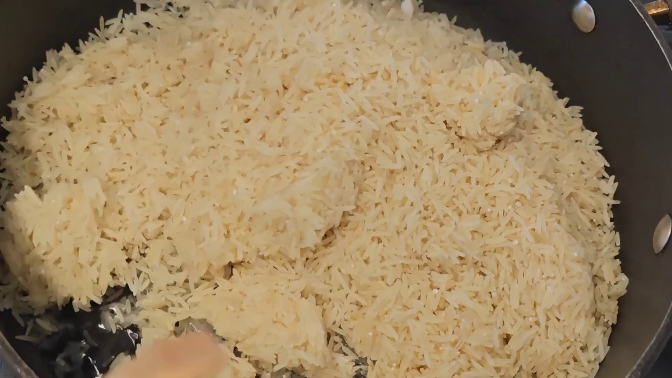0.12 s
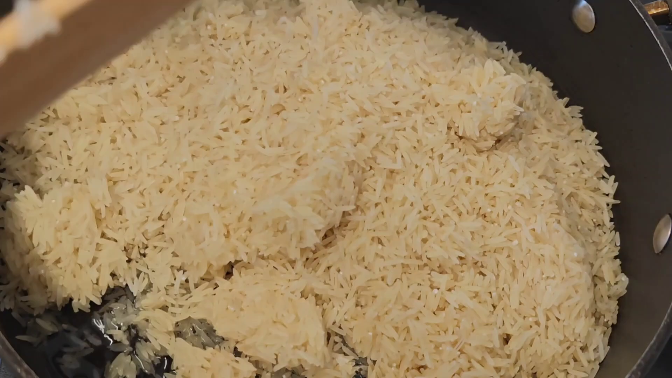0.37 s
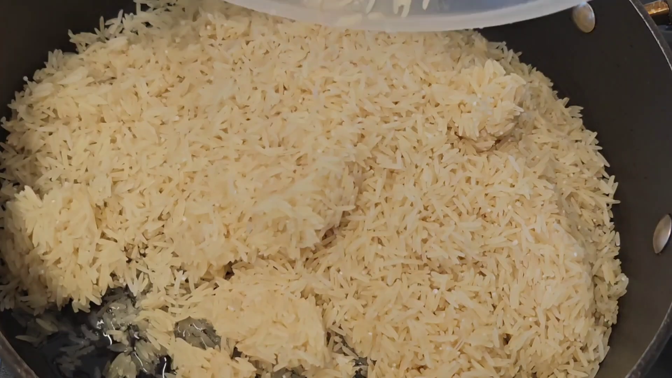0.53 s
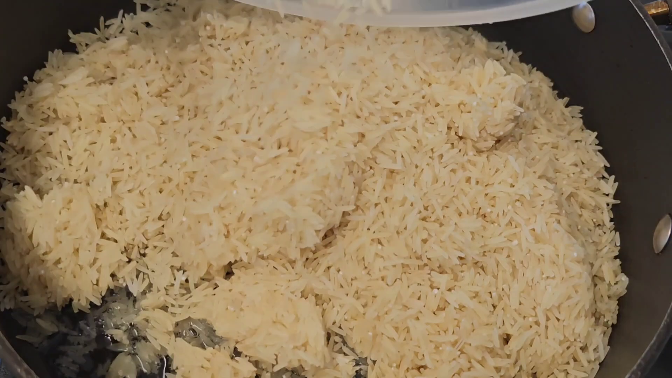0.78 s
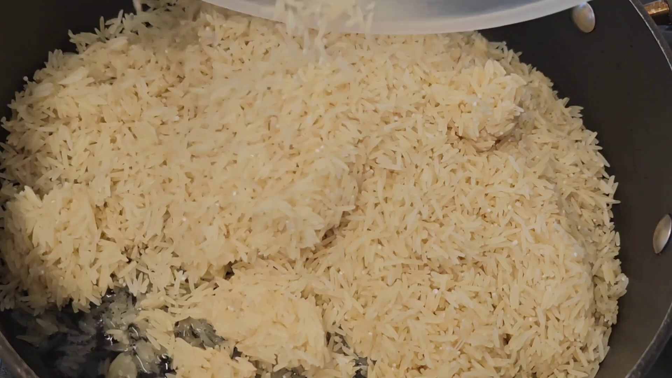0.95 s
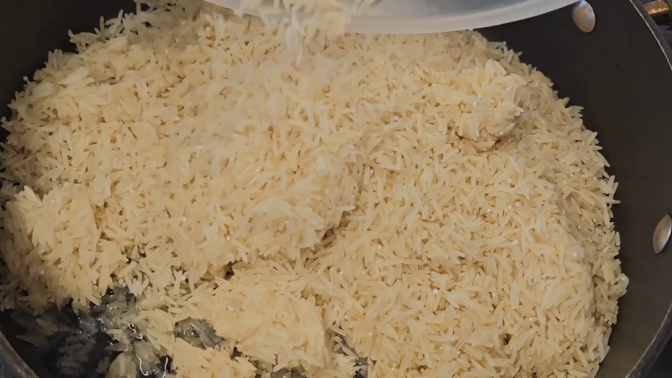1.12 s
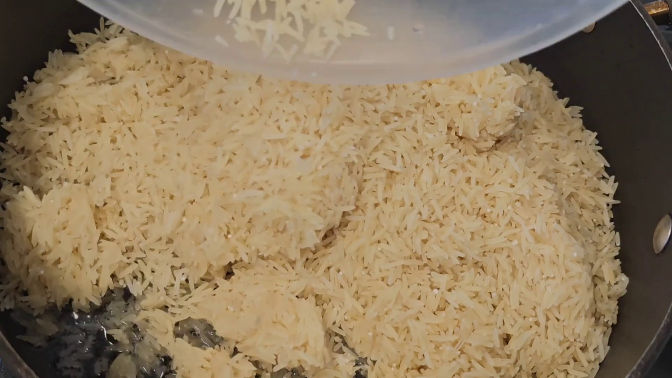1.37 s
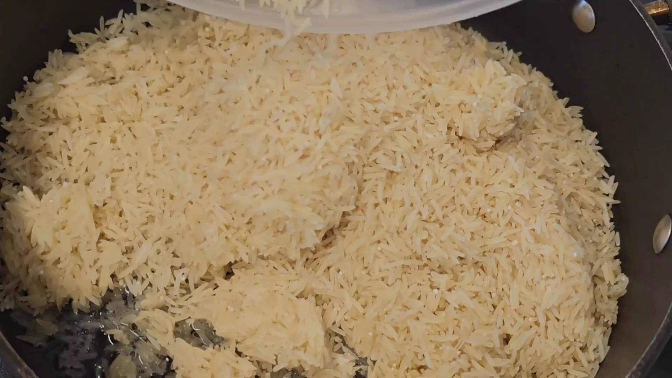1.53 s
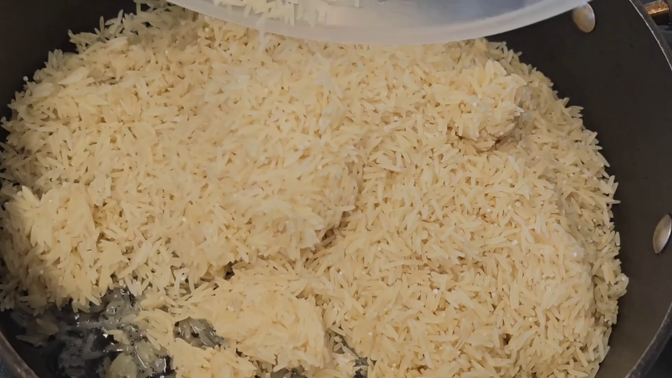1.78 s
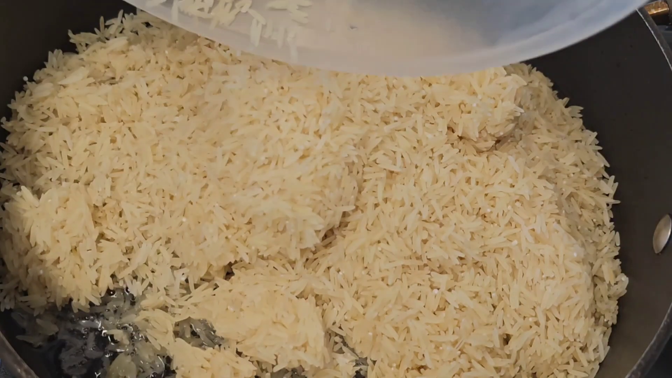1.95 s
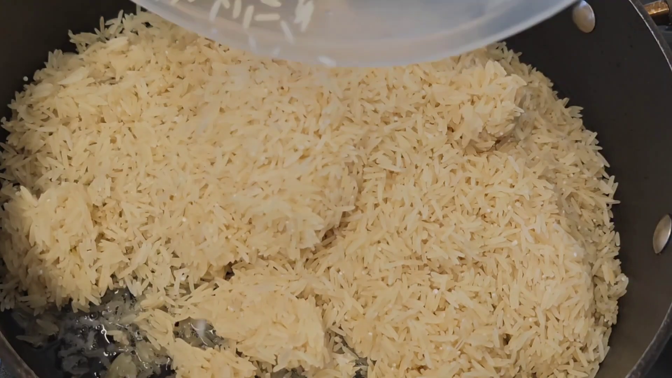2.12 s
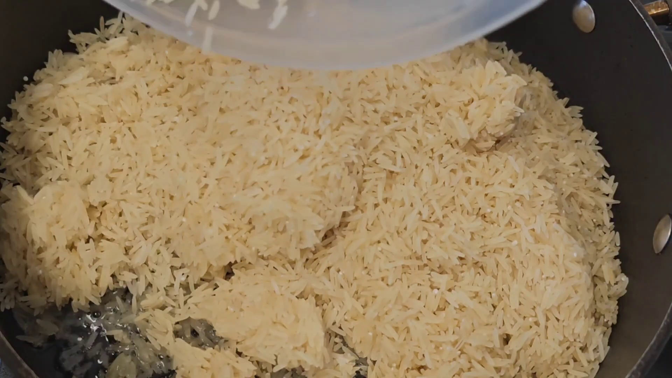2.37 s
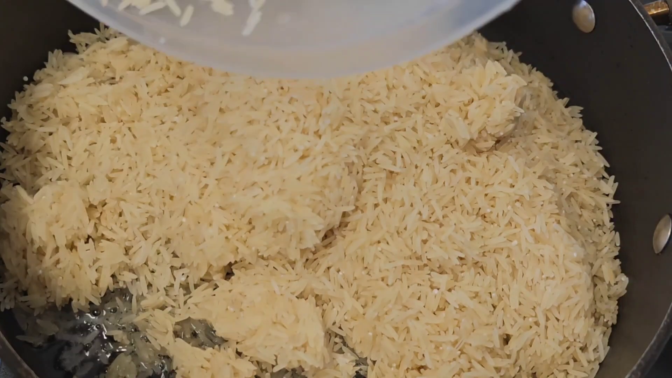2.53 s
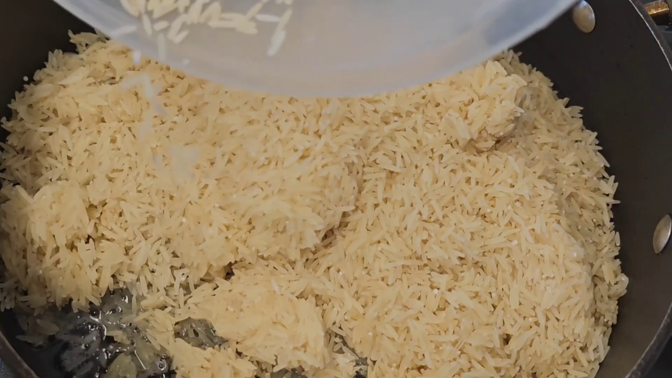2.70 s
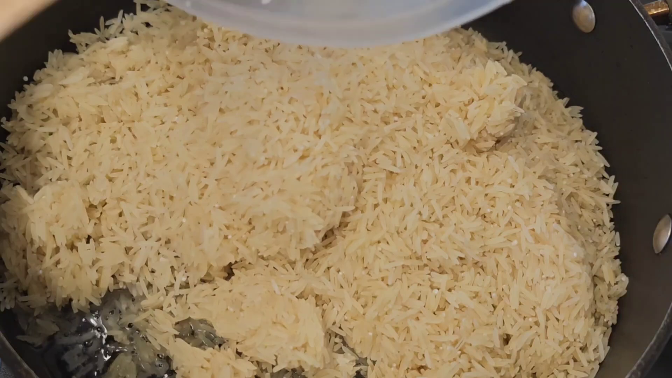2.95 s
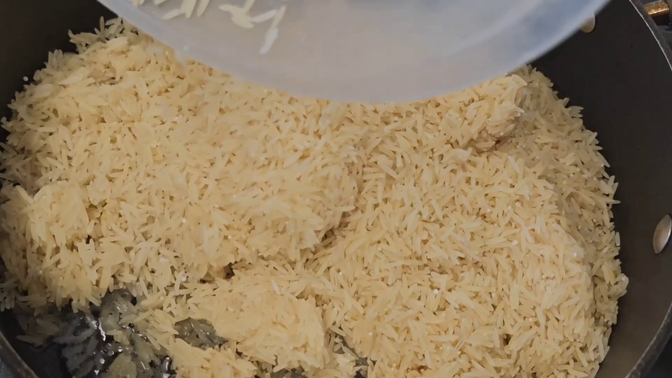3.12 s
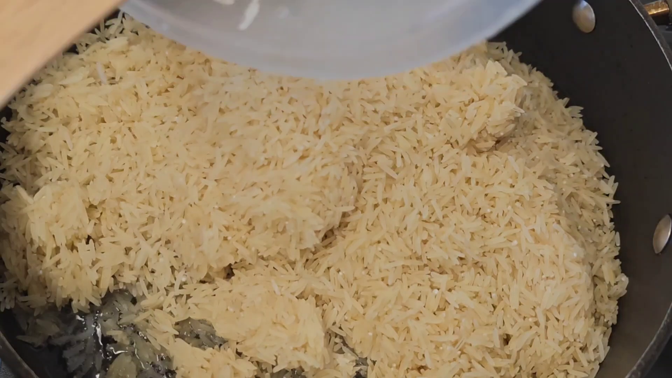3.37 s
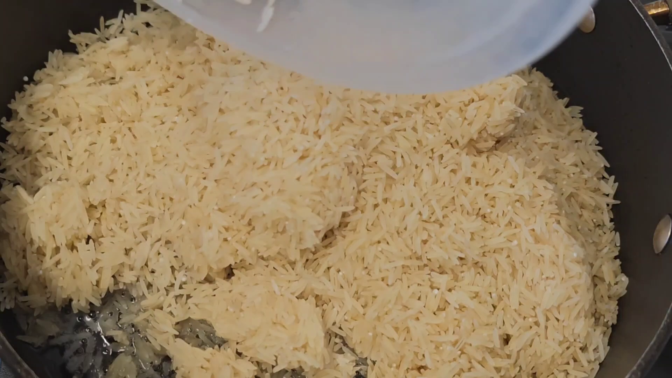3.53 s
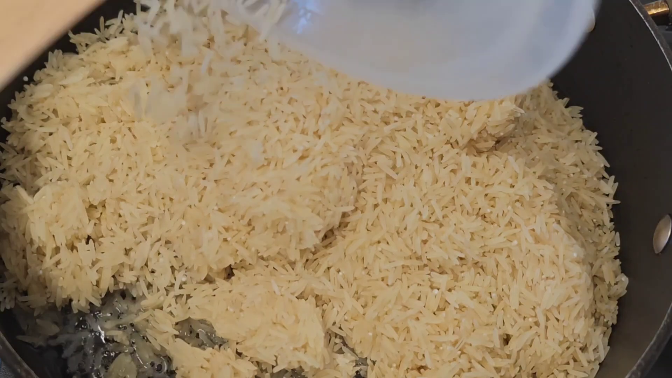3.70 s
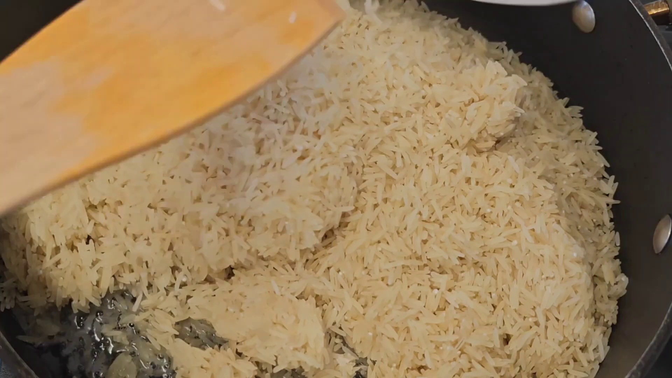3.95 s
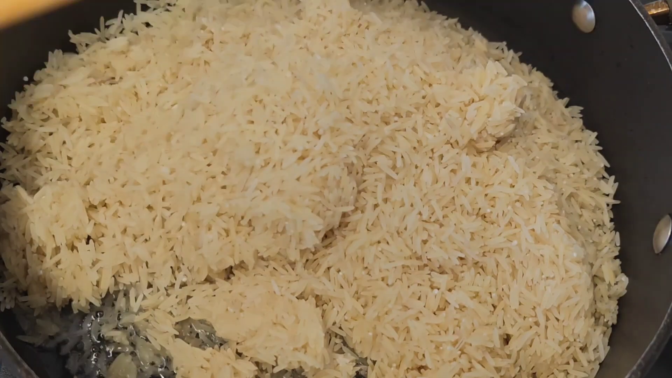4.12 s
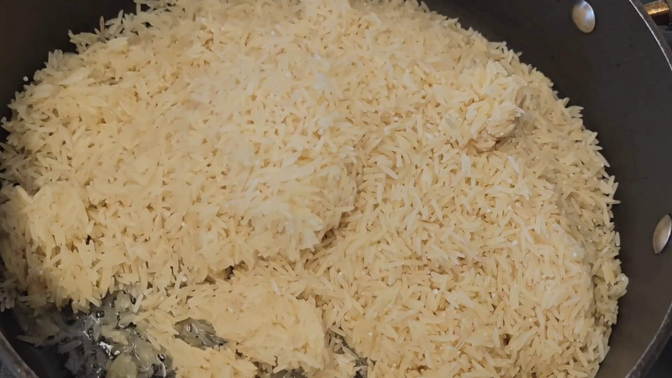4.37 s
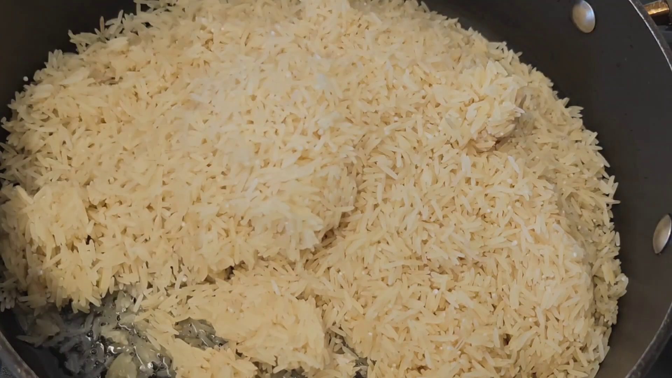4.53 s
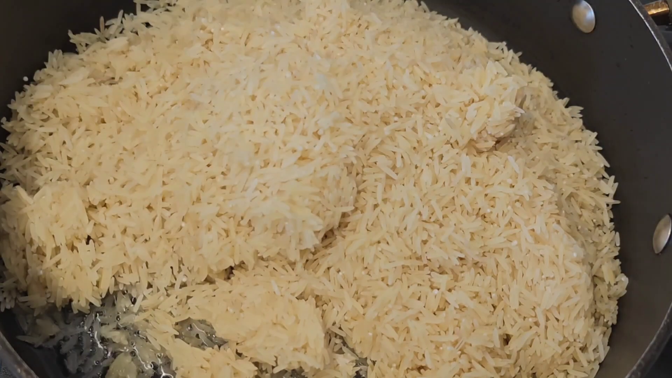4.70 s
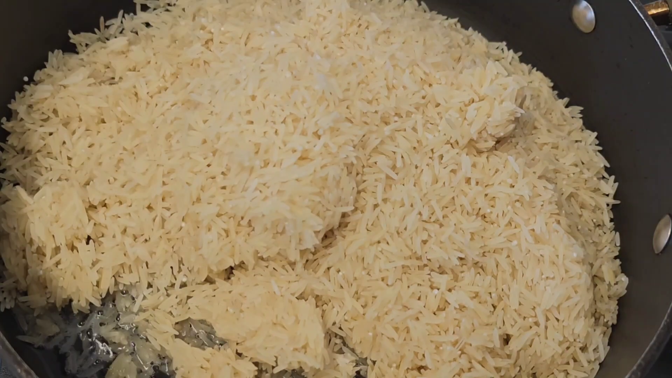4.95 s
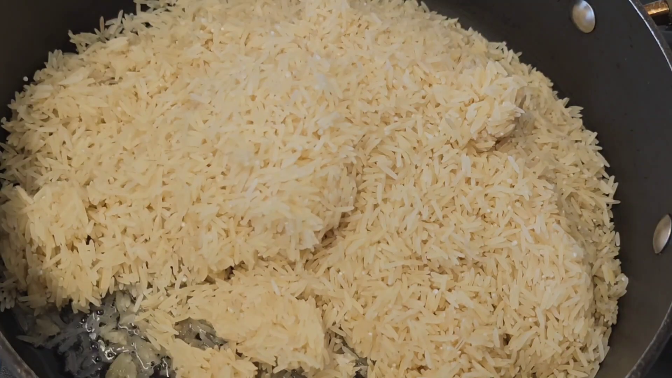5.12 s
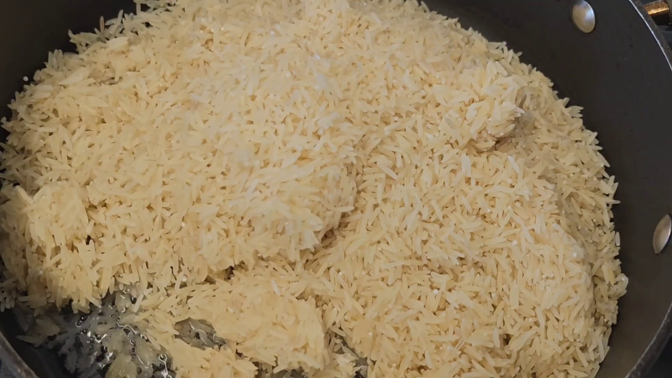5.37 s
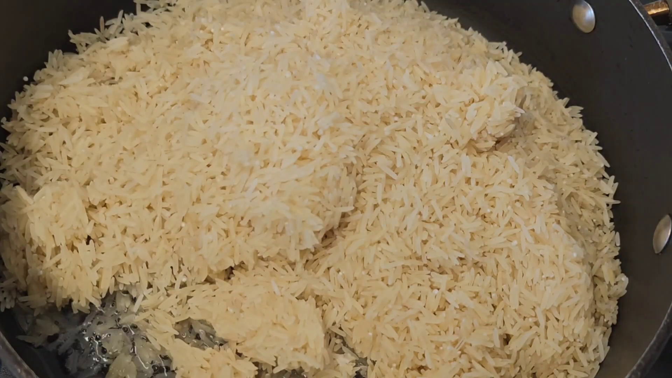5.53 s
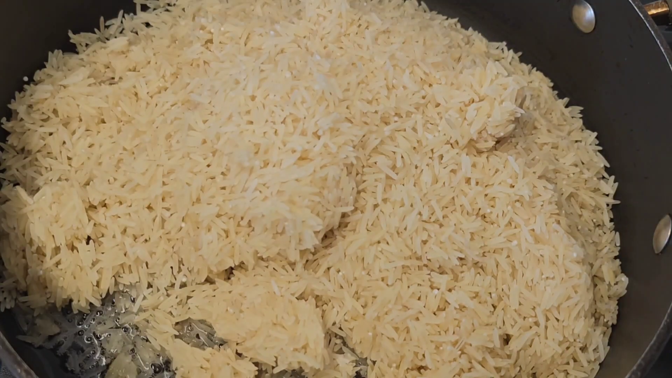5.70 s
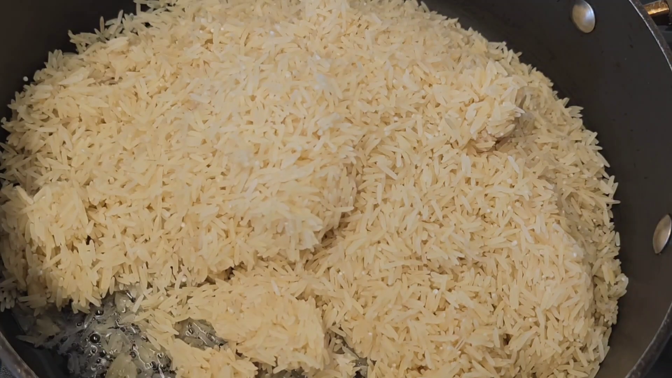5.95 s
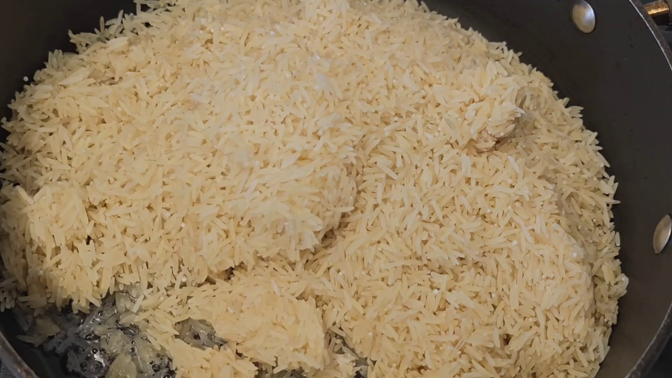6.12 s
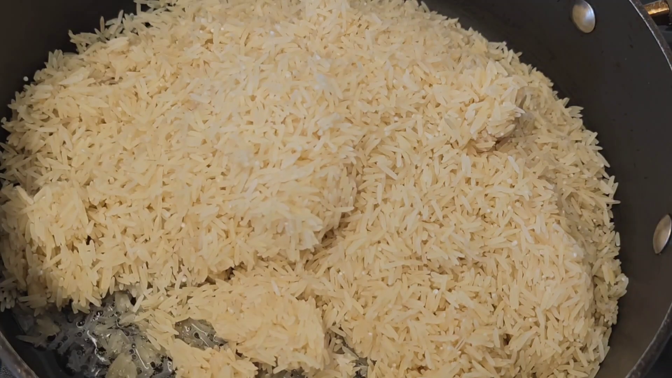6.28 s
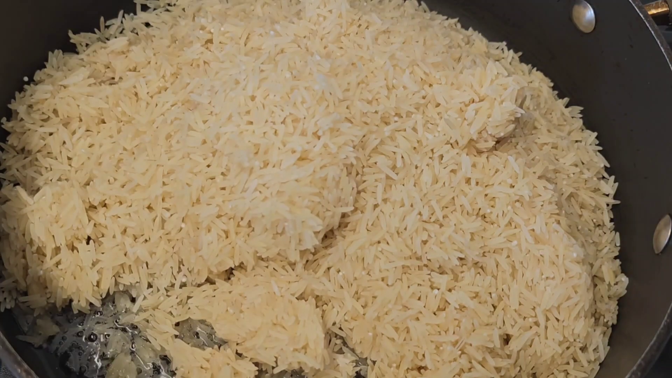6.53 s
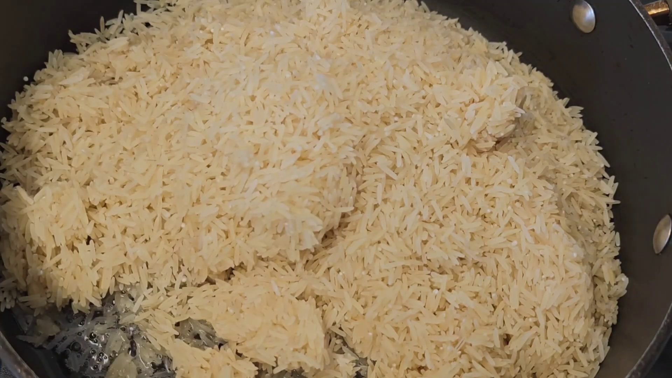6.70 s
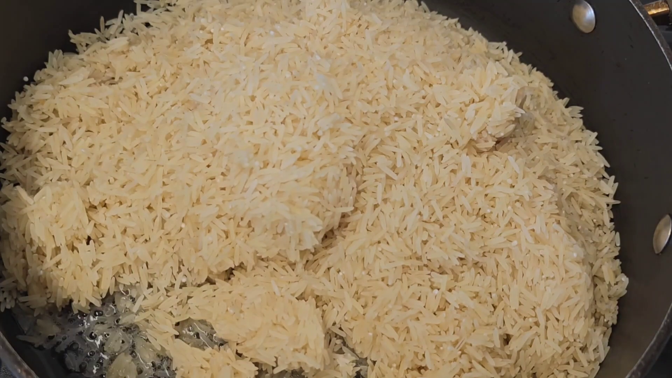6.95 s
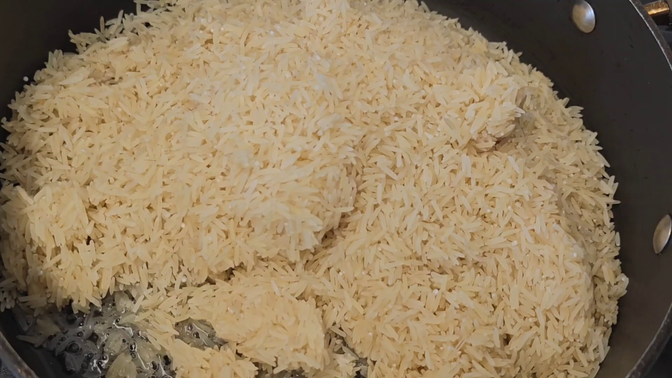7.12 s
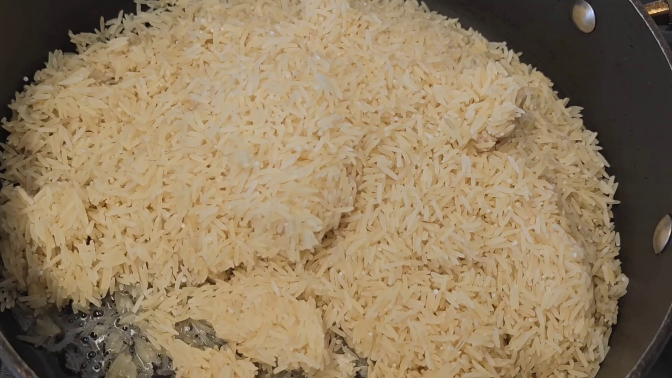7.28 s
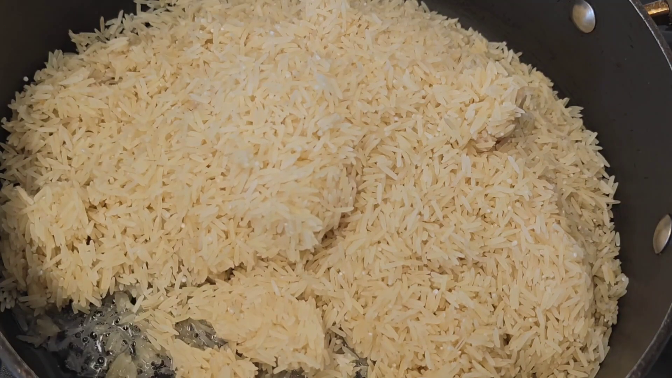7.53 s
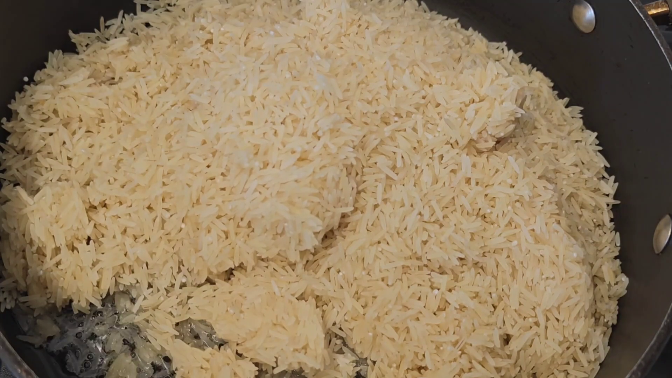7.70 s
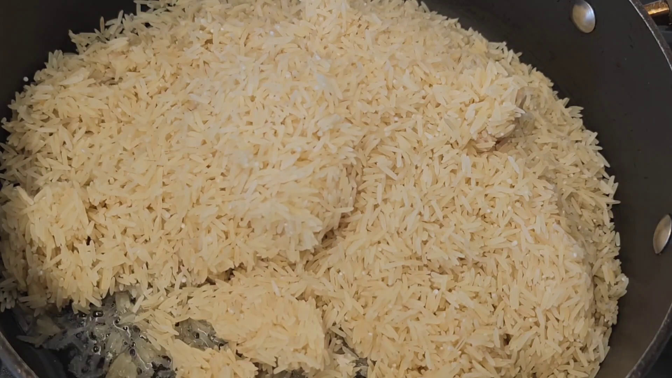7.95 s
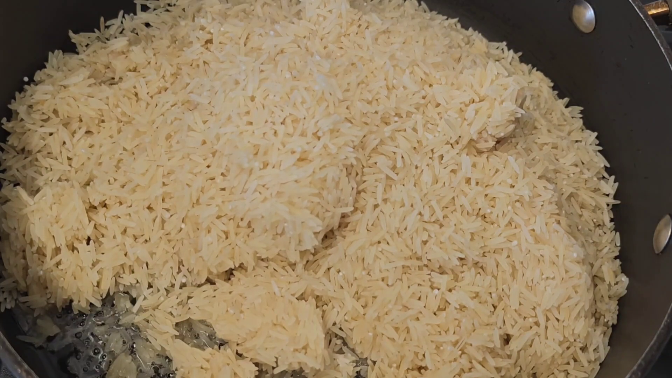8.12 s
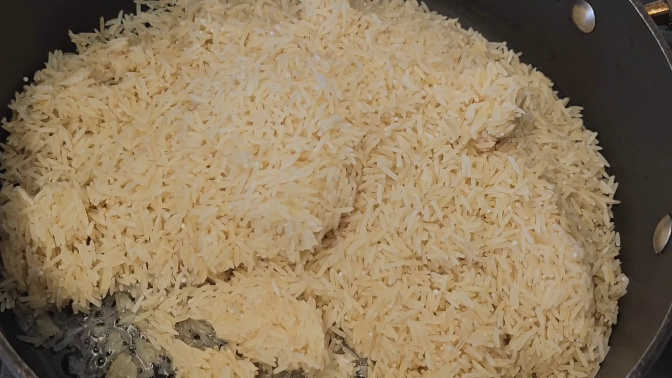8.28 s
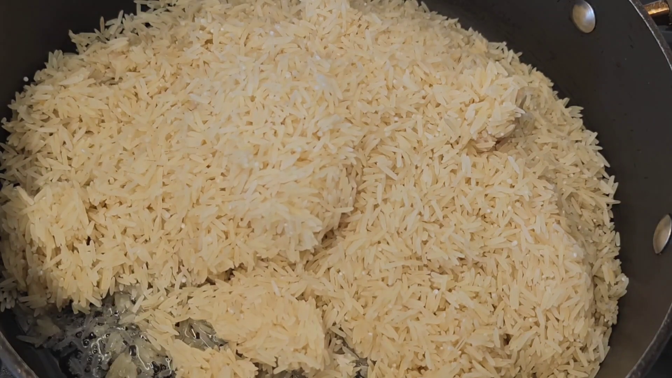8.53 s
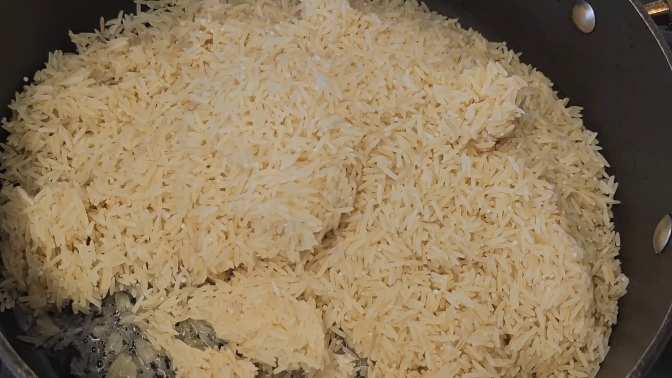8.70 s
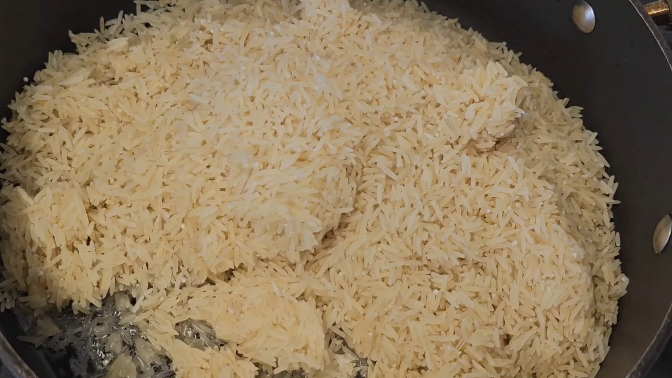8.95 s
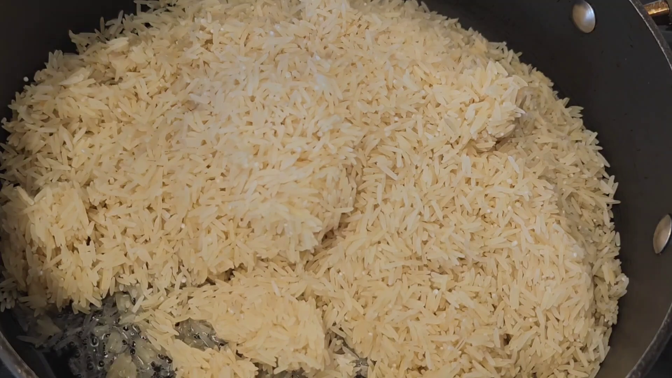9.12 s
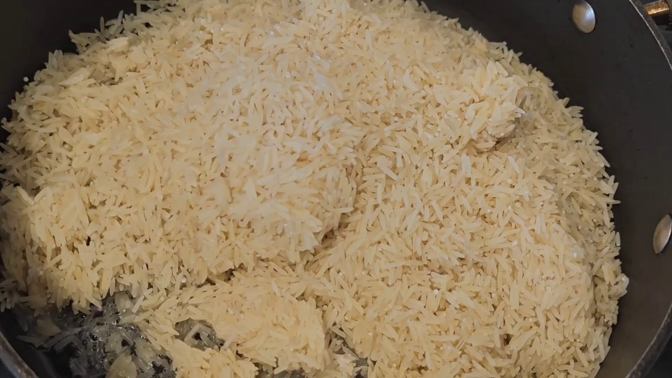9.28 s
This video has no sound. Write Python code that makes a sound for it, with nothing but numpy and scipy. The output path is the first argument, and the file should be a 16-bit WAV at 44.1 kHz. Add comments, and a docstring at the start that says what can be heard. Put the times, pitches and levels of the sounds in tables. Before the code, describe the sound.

Oil fizzes close by in a pot throughout, a fine high hiss with scattered sharp spits and pops. A brief slide of rice grains opens the sound. From about 0.8 to 1.4 seconds a plastic bowl takes five quick hollow knocks as wet raw rice rushes out and patters into the pot. From 2 to 4 seconds a wooden spatula knocks and rubs the bowl in short, uneven strokes, with small spills of grains; the loudest knocks come near 2.6 and 3.5 seconds. Just after 4 seconds the sizzle drops a little and the handling becomes much quieter. Soft scrapes and light trickles of rice continue on and off, with a faint tap near 6 seconds and a few more between 8 and 9.3 seconds. The oil keeps spitting until the end at about 9.5 seconds. A faint low hum of kitchen appliances lies underneath.

```python
"""Rice into a frying pot.

Wet raw rice is shaken and scraped from a plastic bowl into a pot of frying rice, close by.
Grains slide and patter; a wooden spatula knocks and rubs the bowl, driving its modes.
The oil fizzes with small bubbles and spits as water bursts in it. Kitchen machines hum faintly."""
import sys
import numpy as np
from scipy import signal
from scipy.fft import rfft, irfft, next_fast_len
from scipy.io import wavfile

SR = 44100
rng = np.random.default_rng(int(sys.argv[2]) if len(sys.argv) > 2 else 0)


def digitize_waveform(pressure):
    """Quantize a signal to 16-bit integers and store it at the path in sys.argv[1].

    Rows of a 2-D input are taken as channels; values are limited to [-1, 1].
    """
    field = np.atleast_2d(pressure).T
    bounded = np.clip(field, -1, 1)
    quanta = np.round(bounded * 32767).astype(np.int16)
    wavfile.write(sys.argv[1], SR, quanta)


N = 417186

# spatula strokes (time [s], length [s], rice level [dB], rub level [dB], best excited pitch [Hz])
STROKES = [(0, 0.17, -34.5, -78, 500), (0.817, 0.2, -31, -31, 388), (0.986, 0.18, -31, -30.5, 394),
           (1.175, 0.2, -30, -32.5, 420), (1.321, .11, -33, -43, 477), (1.52, 0.14, -63, -39.5, 524),
           (1.612, 0.22, -40, -78, 490), (1.992, 0.19, -58, -39.5, 380), (2.1, 0.13, -33.5, -80, 400),
           (2.412, 0.15, -61, -36.5, 357), (2.595, 0.11, -46, -27.5, 625), (3.052, 0.1, -32, -37, 290),
           (3.485, 0.17, -60, -27, 537), (3.81, 0.12, -34, -32.5, 544), (3.934, 0.23, -40.5, -49, 443),
           (4.567, 0.14, -47.5, -85, 497), (5.18, 0.28, -45, -51.5, 920), (5.453, 0.28, -45.5, -43, 450),
           (6.158, 0.16, -44, -47.5, 1460), (6.447, 0.257, -41.5, -56, 460), (6.605, 0.1, -65, -38.5, 337),
           (6.904, 0.18, -46, -48, 367), (7.55, 0.49, -50.5, -52.5, 567), (8.075, 0.25, -54.5, -45, 980),
           (8.423, 0.13, -44.5, -43.5, 450), (8.556, 0.18, -45.5, -47.5, 1070),
           (8.872, 0.41, -47.5, -46, 374)]
# stray grains between the rushes (time [s], level [dB])
TRICKLE = [(0, -41.5), (4.1, -44.5), (4.3, -55.5)]
# spectrum of running rice (frequency [Hz], relative density [dB])
RICE_SPECTRUM = [(800, -15), (1250, -15.5), (1420, -7.5), (1900, -2), (2800, 1), (4500, -2), (7000, -12),
                 (10000, -45)]
# rice pouring over the rim (time [s], resonance [Hz], level [dB])
POUR = [(0.83, 2290, -42), (0.97, 2400, -23.5), (1.06, 1940, -35), (1.23, 1680, -28), (1.42, 2360, -52)]
# blows on the bowl (time [s], peak [dB], best excited pitch [Hz], crack re peak [dB])
KNOCKS = [(0.831, -17.5, 170, 9.5), (1, -18, 192, 14), (1.167, -16.5, 500, 9), (1.308, -13.5, 450, 6.5),
          (1.411, -17.5, 450, -1), (1.98, -18, 191, -27), (2.426, -13.5, 414, 0.5),
          (2.593, -6.5, 640, -7.5), (2.802, -20, 236, -8), (2.826, -11.5, 238, -3),
          (3.067, -18.5, 330, -12), (3.275, -12, 275, -10), (3.462, -21.5, 757, 1.5), (3.493, -14, 590, 0),
          (3.505, -7.5, 555, -8.5), (3.814, -13.5, 285, 1), (5.978, -37.5, 454, 9), (8.02, -36, 179, 4),
          (8.417, -29, 133, 2), (8.48, -32.5, 666, 6.5), (8.901, -40.5, 500, 17), (9.323, -35, 131, 1)]
# modes of the bowl (frequency [Hz], gain [dB], t60 [s])
BOWL_MODES = [(105, 5, 0.046), (195.5, -11, 0.042), (270, 3.5, 0.16), (346.6, 5.5, 0.17), (450, 8, 0.051),
              (534, 11.5, 0.047), (658.6, 14.5, 0.079), (756, 4, 0.18), (1010, 4.5, 0.044),
              (1440, 9, 0.046), (1940, 10, 0.0079)]
# where the bowl is held (time [s], left minus right [dB])
BOWL_PAN = [(0, 2), (1.5, 0.5), (2.4, 6), (9.46, 1.5)]
# fizz of the oil (time [s], level [dB])
FIZZ_LEVEL = [(0.0, -32.5), (0.66, -35.5), (1.16, -32), (1.5, -36), (2.47, -30.5), (4.06, -31.5),
              (4.32, -40.5), (4.69, -38.5), (7.88, -36), (8.01, -39.5), (9.46, -39.5)]
# spectrum of frying as the microphone colours it, with the microphone's peak near 7.8 kHz and its fall above
# 15.7 kHz (frequency [Hz], relative density [dB])
MIC_COLOURED_FRYING = [(600, -53), (1400, -18), (2030, -13.5), (2450, -10.5), (5810, -7.5), (6690, -7),
                       (7850, -0.5), (9600, -6), (14600, -3.5), (15700, -16), (16500, -54)]
# water bursting in the oil (time [s], peak before colouring [dB])
SPITS = [(0.389, -12), (0.709, -8.5), (1.69, -12.5), (1.909, -10.5), (2.097, -11), (2.3, -16),
         (2.391, -9.5), (2.72, -10), (3.325, -12), (3.94, -9.5), (3.983, -11.5), (4.073, -7.5),
         (4.568, -12.5), (4.652, -11), (4.699, -12), (4.902, -15.5), (4.967, -12.5), (5.836, -11.5),
         (6.416, -12.5), (6.463, -16), (6.518, -14), (7.007, -11), (8.543, -13.5), (9.049, -15),
         (9.124, -14), (9.2, -15), (9.255, -17), (9.419, -13)]
# bubbles popping with no hiss after them (time [s], peak before colouring [dB])
DRY_POPS = [(0.239, -10), (4.462, -15.5), (4.513, -39), (4.691, -13.5), (5.171, -17), (6.281, -25),
            (6.351, -11.5), (6.374, -10.5), (7.229, -12.5), (7.36, -33), (8.381, -17), (8.668, -16)]
# motor tones (frequency [Hz], peak [dB])
MOTOR_TONES = [(162.4, -54), (325, -71.5)]
# rumble of the room air (frequency [Hz], relative density [dB])
AIR_SPECTRUM = [(40, -11.5), (77, -20), (190, -4), (280, -22.5), (586, -20.5), (856, -23.5), (1500, -23),
                (1950, -115)]


def running_rice(spill_s=0.014):
    """Hard grains slide over the bowl and patter on the heap, running on after each stroke."""
    power = gain_of(curve(TRICKLE, column=1))[None] ** 2
    for start_s, length_s, db, _, _ in STROKES:
        rush = gain_of(db) * signal.windows.tukey(round((length_s + spill_s) * SR), 0.16)
        add(power, start_s, rush[None] ** 2)
    slide = stereo_noise(N, correlation=0.4) * gain_of(3 * flutter(0.01))
    patter = crackle(per_s=350, spread_db=-0.5, lo_hz=1480, hi_hz=5280, clump_db=1.5,
                     snap_s=0.00035, rise_s=0.0021, half_width_oct=0.39, bands=5)
    return np.sqrt(power) * coloured(unit_rms(slide) + gain_of(-3.5) * patter, RICE_SPECTRUM)


def pouring_rice(width_hz=1200):
    """Dense grain taps through one broad resonance that follows the tilt of the bowl."""
    start, end = round(POUR[0][0] * SR), round(POUR[-1][0] * SR)
    taps = rng.standard_normal((2, end - start)) * (rng.random(end - start) < 0.05)
    carrier = np.exp(2j * np.pi * np.cumsum(curve(POUR, column=1)[start:end]) / SR)
    pole = np.exp(-np.pi * width_hz / SR)
    # shift down, low-pass, shift back: a moving band-pass
    baseband = signal.lfilter([1], np.convolve([1, -pole], [1, -pole]), taps / carrier)
    out = np.zeros((2, N))
    out[:, start:end] = unit_rms((carrier * baseband).real) * gain_of(curve(POUR, column=2)[start:end])
    return out


def bowl_knocks(spread_oct=0.88, thud_s=0.0056, rise_s=0.0012, ring_db=-16, rattle_db=-28, rattle_s=0.14):
    """Each blow thuds at the pitch its spot favours, rings the modes near that pitch and cracks."""
    out, t = np.zeros((2, N)), np.arange(SR // 4) / SR
    hz, mode_db, t60_s = np.array(BOWL_MODES).T[:, :, None]
    detunes = 1 + 0.03 * rng.standard_normal((len(KNOCKS), len(BOWL_MODES), 1))  # grip shifts the modes
    for (start_s, db, best_hz, crack_db), detune in zip(KNOCKS, detunes):
        envelopes = nearness(hz, best_hz, spread_oct) * gain_of(mode_db + ring_db - 60 * t / t60_s)
        ring = (envelopes * np.sin(2 * np.pi * hz * detune * t)).sum(0)
        thud = np.exp(-t / thud_s) * np.minimum(t / rise_s, 1) * np.sin(2 * np.pi * best_hz * t)
        force = gain_of(rattle_db) * stereo_noise(len(t), correlation=0.77) * np.exp(-t / rattle_s)
        force[:, :40] += np.hanning(40)  # the blow; the shaken rice rattles on after it
        blow = signal.fftconvolve(force, (ring + thud)[None], axes=1)
        blow = highpass(blow, best_hz / 3, order=2)  # thin plastic radiates little bass
        add(out, start_s, gain_of(db) * blow / abs(blow).max())
        crack_hz = 1980 * 2 ** (crack_db / 20)  # harder is brighter
        crack = burst(crack_hz, half_width_oct=0.72, snap_s=0.0025, rise_s=0.00071)
        add(out, start_s, gain_of(db + crack_db) * crack)
    return out


def bowl_rubbing(spread_oct=0.41, far_modes_db=-4.5, held_t60_ratio=0.56, fade_db=-5):
    """Uneven slips of the spatula drive the modes of the bowl, damped by the hand that holds it."""
    slips = stereo_noise(N, correlation=0.85) * gain_of(5 * flutter(0.0077))
    out = np.zeros((2, N))
    for start_s, length_s, _, db, best_hz in STROKES:
        force = slips[:, round(start_s * SR):][:, :round(length_s * SR)]
        grip_db = 3 * rng.standard_normal(len(BOWL_MODES))  # each grip frees other modes
        body = np.zeros_like(force)
        for k, (hz, mode_db, t60_s) in enumerate(BOWL_MODES):
            drive = nearness(hz, best_hz, spread_oct) + gain_of(far_modes_db)
            mode = resonator(force, hz, held_t60_ratio * t60_s)
            body += (-1) ** k * gain_of(mode_db + grip_db[k]) * drive * mode
        progress = np.linspace(0, 1, force.shape[1])
        envelope = np.minimum(progress / 0.072, 1) * np.minimum((1 - progress) / 0.59, 1)
        add(out, start_s, gain_of(db + fade_db * progress) * envelope * unit_rms(body))
    return out


def oil_fizz():
    """Fine hiss that flares up, a crackle of small bubbles and puffs of steam."""
    hiss = rng.standard_normal((2, N)) * gain_of(1.5 * flutter(0.02) + 3.5 * flutter(0.1))
    bubbles = crackle(per_s=240, spread_db=5, lo_hz=3500, hi_hz=13500, clump_db=4,
                      snap_s=0.00015, rise_s=0.0001)
    puffs = crackle(per_s=60, spread_db=3, lo_hz=4000, hi_hz=13000, clump_db=3,
                    snap_s=0.0008, rise_s=0.003)
    fizz = coloured(unit_rms(hiss) + gain_of(-1.5) * bubbles + puffs, MIC_COLOURED_FRYING)
    return gain_of(curve(FIZZ_LEVEL, column=1)) * fizz


def oil_spits(hiss_db=-19.5, hiss_s=0.047, hiss_rise_s=0.006):
    """Water bursts with a trailing hiss, other bubbles pop dry; both echo off the pot wall."""
    out, t = np.zeros((2, N)), np.arange(SR // 8) / SR
    hiss_envelope = np.exp(-t / hiss_s) * np.minimum(t / hiss_rise_s, 1)
    for start_s, db in SPITS:
        hz = 8500 * 2 ** (0.2 * rng.standard_normal())
        add(out, start_s, gain_of(db) * burst(hz, half_width_oct=0.82, snap_s=0.00089, rise_s=0.00078))
        add(out, start_s, gain_of(db + hiss_db) * rng.standard_normal((2, len(t))) * hiss_envelope)
    for start_s, db in DRY_POPS:
        pop = burst(5500, half_width_oct=1.8, snap_s=0.00015, rise_s=0.0001, echo_db=-10)
        add(out, start_s, gain_of(db) * pop)
    return coloured(out, MIC_COLOURED_FRYING) * out.std()


def kitchen(pair_hz=100.4, beat_hz=1.51, air_db=-55):
    """Motor tones, the beat of two motors nearly in tune, and a low rumble of air."""
    t = np.arange(N) / SR
    hum = sum(gain_of(db + 1.1 * flutter(0.3)) * np.sin(2 * np.pi * hz * t) for hz, db in MOTOR_TONES)
    beat = 0.4 + 0.27 * np.cos(2 * np.pi * beat_hz * (t - 0.5))
    hum += gain_of(-50 + 1.5 * flutter(0.14)) * beat * np.sin(2 * np.pi * pair_hz * t)
    hum = np.array([hum, np.roll(hum, 20)]) * gain_of([[0.5], [-0.5]])  # from the left
    air = stereo_noise(N, correlation=0.33) * gain_of(4.3 * flutter(0.24))
    return hum + gain_of(air_db) * coloured(air, AIR_SPECTRUM)


def burst(hz, half_width_oct, snap_s, rise_s, echo_s=0.002, echo_db=-5):
    """One snap of band noise with an echo and a short tail; peak 1."""
    t = np.arange(1200) / SR
    snap = np.exp(-t / snap_s)
    echo = gain_of(echo_db) * np.exp(-np.maximum(t - echo_s, 0) / snap_s) * (t >= echo_s)
    tail = gain_of(-16) * np.exp(-t / 0.007)
    noise = rng.standard_normal((2, len(t))) * (snap + echo + tail) * np.minimum(t / rise_s, 1)
    out = bandpass(noise, hz, half_width_oct)
    return out / abs(out).max()


def crackle(per_s, spread_db, lo_hz, hi_hz, clump_db, snap_s, rise_s, half_width_oct=0.6, bands=6):
    """Clumps of small noise bursts, varied in pitch and size; rms 1."""
    hits = rng.random(N) < per_s / SR * gain_of(clump_db * flutter(0.05))
    sizes = gain_of(spread_db * np.minimum(rng.exponential(1, N), 3)) * hits
    band_of_hit = rng.integers(0, bands, N)
    noise = rng.standard_normal((2, N))
    out, t = np.zeros((2, N)), np.arange(1200) / SR
    shape = (np.exp(-t / snap_s) + gain_of(-18) * np.exp(-t / 0.007)) * np.minimum(t / rise_s, 1)
    for k, hz in enumerate(np.geomspace(lo_hz, hi_hz, bands)):
        envelope = signal.oaconvolve(sizes * (band_of_hit == k), shape)[:N]
        out += unit_rms(bandpass(noise * envelope, hz, half_width_oct))
    return unit_rms(out)


def resonator(x, hz, t60_s):
    """One two-pole mode; rms 1."""
    radius = np.exp(-np.log(1000) / t60_s / SR)
    poles = [1, -2 * radius * np.cos(2 * np.pi * hz / SR), radius ** 2]
    return unit_rms(signal.lfilter([1, 0, -1], poles, x))


def nearness(hz, best_hz, spread_oct):
    return np.exp(-(np.log2(hz / best_hz) / spread_oct) ** 2)


def bandpass(x, hz, half_width_oct):
    edges_hz = np.clip(hz * 2 ** (half_width_oct * np.array([-1, 1])), 100, 20000)
    return signal.sosfilt(signal.butter(2, edges_hz, "bandpass", fs=SR, output="sos"), x)


def highpass(x, hz, order):
    return signal.sosfilt(signal.butter(order, hz, "highpass", fs=SR, output="sos"), x)


def coloured(x, spectrum):
    """x filtered by (frequency [Hz], gain [dB]) points; rms 1."""
    size = next_fast_len(x.shape[-1])
    hz, db = np.transpose(spectrum)
    gains = gain_of(np.interp(np.log(np.fft.rfftfreq(size, 1 / SR) + 1), np.log(hz + 1), db))
    return unit_rms(irfft(rfft(x, size) * gains, size)[..., :x.shape[-1]])


def flutter(drift_s, hop=32):
    """Smooth random drift; rms 1."""
    steps = rng.standard_normal(N // hop + 2)
    kernel = signal.windows.hann(max(round(2 * drift_s * SR / hop), 3))
    drift = unit_rms(signal.oaconvolve(steps, kernel, "same"))
    return np.interp(np.arange(N) / hop, np.arange(len(steps)), drift)


def stereo_noise(samples, correlation):
    left, other = rng.standard_normal((2, samples))
    return np.array([left, correlation * left + np.sqrt(1 - correlation ** 2) * other])


def curve(rows, column):
    """One column of a time table at every sample."""
    return np.interp(np.arange(N) / SR, [row[0] for row in rows], [row[column] for row in rows])


def add(mix, start_s, sound):
    part = mix[:, round(start_s * SR):][:, :sound.shape[1]]
    part += sound[:, :part.shape[1]]


def gain_of(db):
    return 10 ** (np.asarray(db) / 20)


def unit_rms(x):
    return x / np.sqrt(np.mean(x ** 2) + 1e-20)


def scene():
    """The moving bowl over the frying pot and the kitchen hum."""
    pot = oil_fizz() + oil_spits()
    bowl = running_rice() + pouring_rice() + bowl_rubbing() + bowl_knocks()
    left_db = curve(BOWL_PAN, column=1) / 2
    return bowl * gain_of([left_db, -left_db]) + pot + kitchen()


def record(dry):
    """Two small microphones: the right hears 4 samples later; both lose deep bass and top treble."""
    mics = np.array([dry[0], np.pad(dry[1], (4, 0))[:N]])
    mics = highpass(mics, hz=80, order=3)
    lowpass = signal.firwin(511, 16600, window=("kaiser", 9), fs=SR)
    return signal.oaconvolve(mics, lowpass[None], "same")


dry = scene()
out = record(dry)
digitize_waveform(out)
```